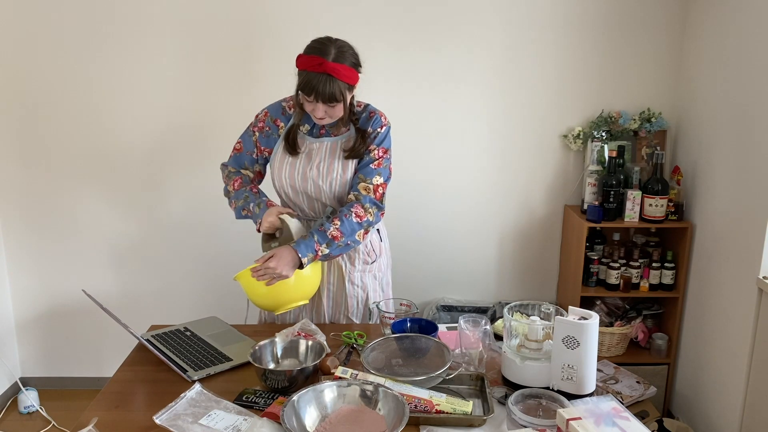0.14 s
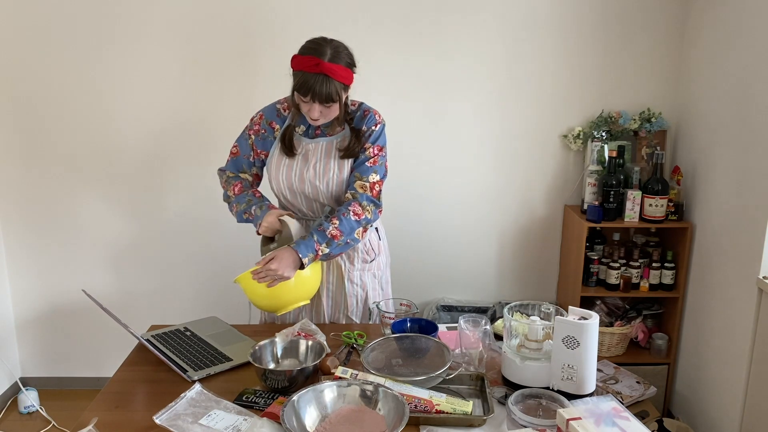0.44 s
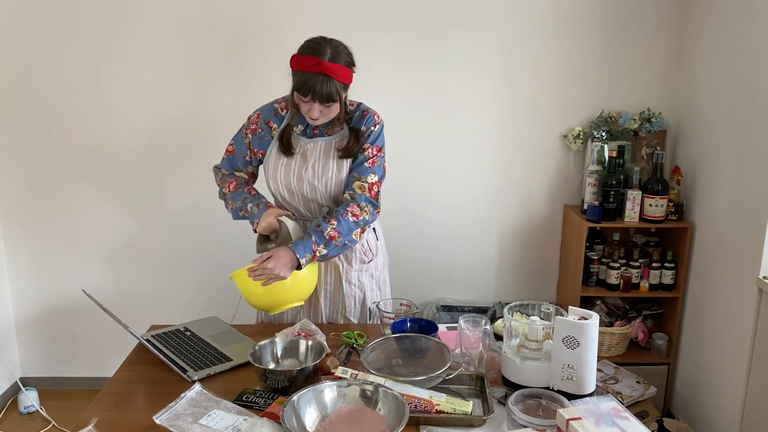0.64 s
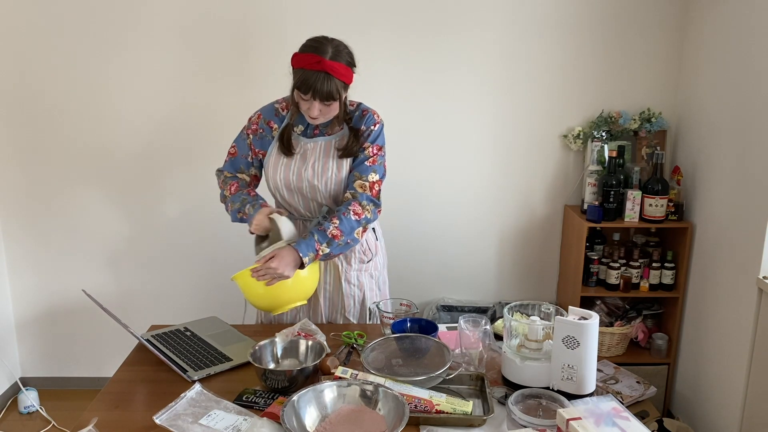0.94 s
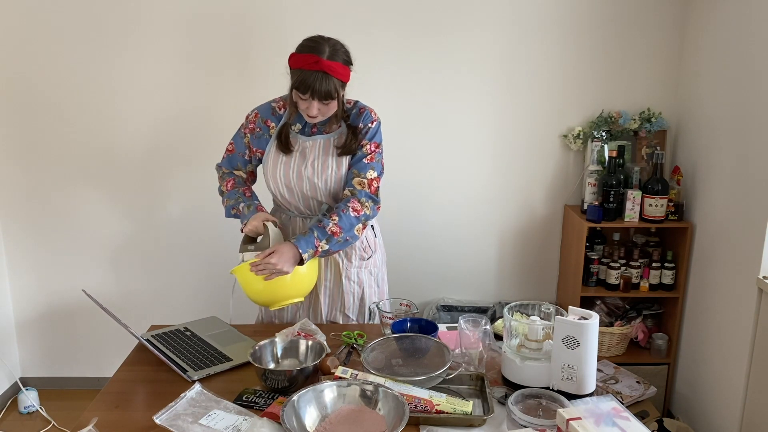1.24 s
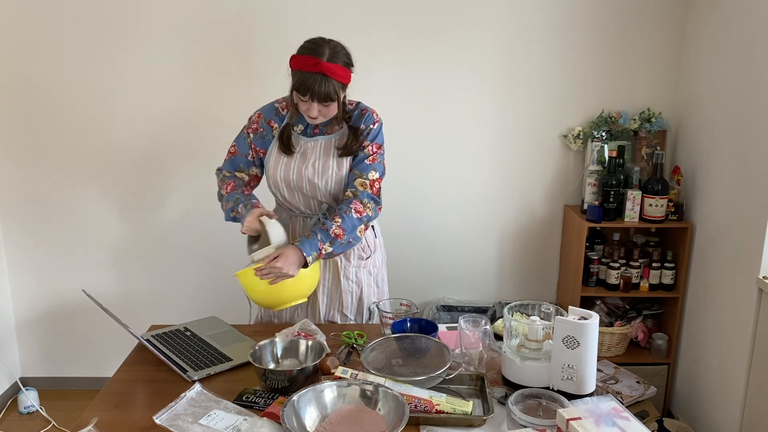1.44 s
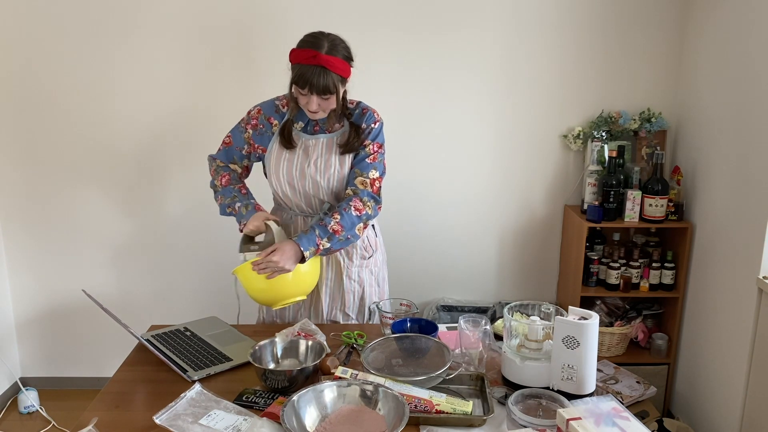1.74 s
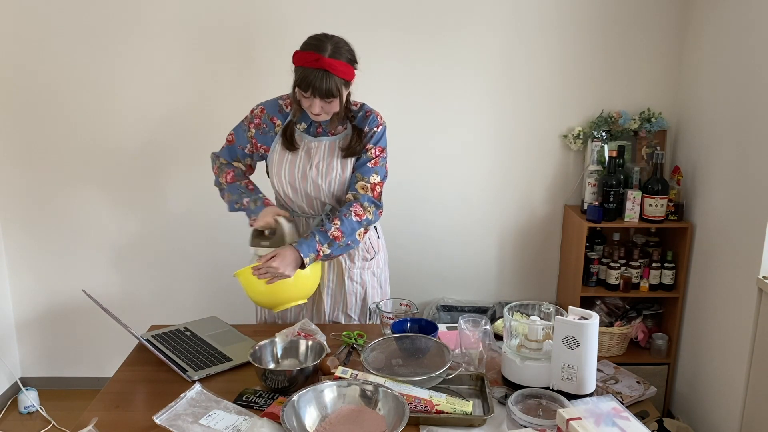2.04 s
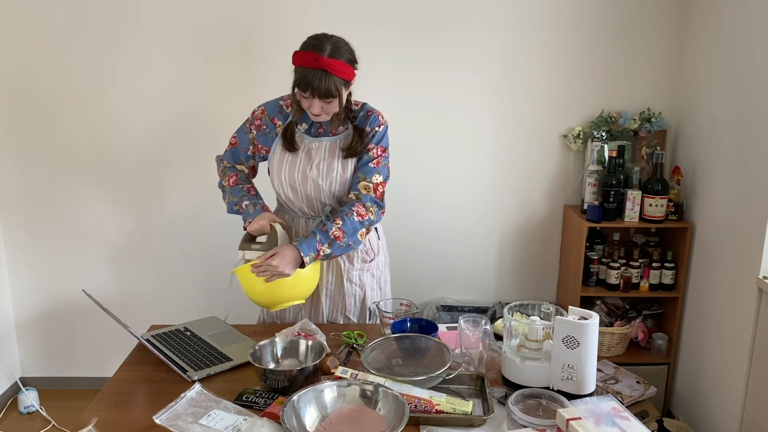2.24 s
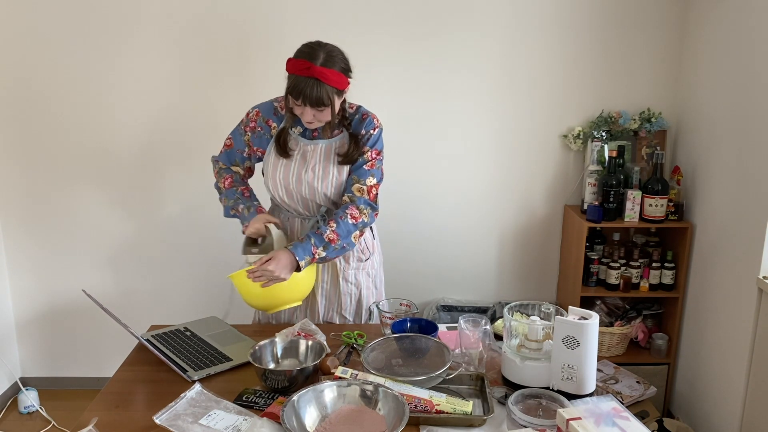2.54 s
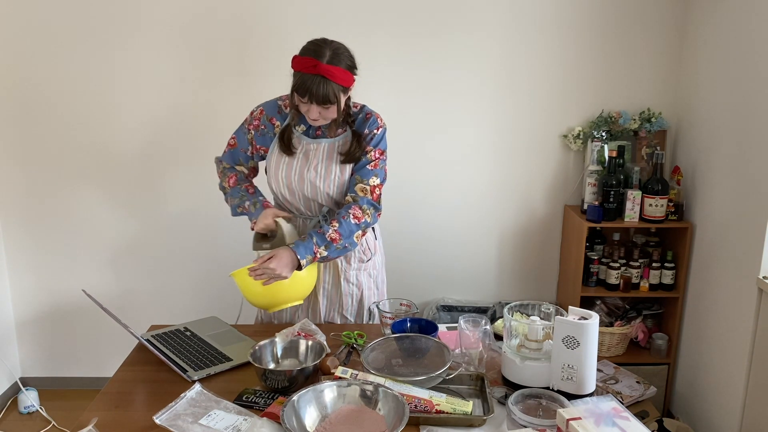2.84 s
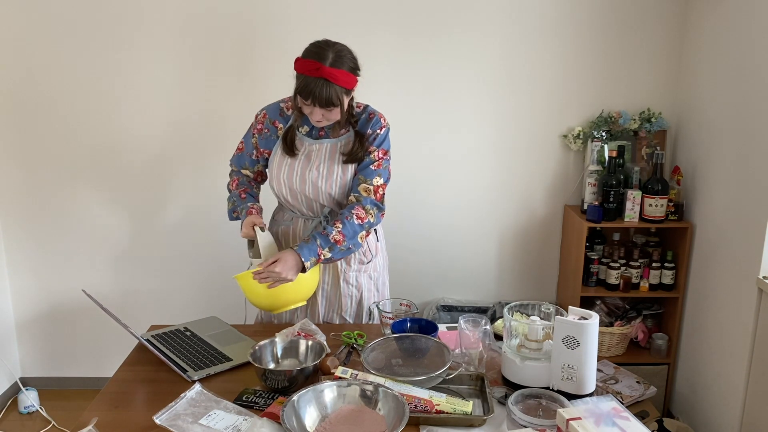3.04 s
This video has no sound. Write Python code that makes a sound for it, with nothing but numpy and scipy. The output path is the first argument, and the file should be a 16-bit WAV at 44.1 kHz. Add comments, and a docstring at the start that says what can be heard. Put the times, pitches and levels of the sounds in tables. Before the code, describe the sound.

Electric hand mixer whips a mixture, beaters clattering rapidly in a plastic bowl, pulsing steadily.

```python
"""In a small kitchen, an electric hand mixer whips a mixture in a plastic bowl.
The beater wires clatter and scrape: trains of blows ring the bowl, harder and faster once in each turn.
Single knocks stand out; the flung mixture splashes as grainy noise.
Near the end the wires lift clear, leaving the motor's whine (gliding sines) and fan (noise),
then settle into an even rattle."""
import sys
import numpy as np
from scipy import signal
from scipy.fft import rfft, irfft, next_fast_len
from scipy.io import wavfile
from scipy.ndimage import uniform_filter1d, minimum_filter1d, map_coordinates

SR = 44100
rng = np.random.default_rng(int(sys.argv[2]) if len(sys.argv) > 2 else 0)


def bounce(signal):
    """Save signal as a 16-bit WAV file at the path given by the first command-line argument."""
    frames = np.transpose(np.atleast_2d(signal))
    limited = np.clip(frames, -1, 1)
    pcm = np.round(limited * 32767).astype(np.int16)
    wavfile.write(sys.argv[1], SR, pcm)


N = 141120


def amp(db):
    """Amplitude factor of a level in dB."""
    return 10 ** (np.asarray(db) / 20)


def unit(x):
    """x scaled to rms 1."""
    return x / np.sqrt(np.mean(x ** 2) + 1e-20)


def along(points, hz):
    """Interpolate (frequency [Hz], value) points on a log frequency axis."""
    point_hz, value = np.transpose(points)
    return np.interp(np.log(hz + 1), np.log(point_hz + 1), value)


def wobble(knots_per_s):
    """Smooth random curve through normally distributed knots."""
    knots = rng.standard_normal(int(N * knots_per_s / SR) + 4)
    return map_coordinates(knots, [np.arange(N) * knots_per_s / SR])


def coloured(x, points):
    """Minimum-phase filter through (frequency [Hz], gain [dB]) points, made by folding the cepstrum."""
    m = 2 * next_fast_len(N)
    cepstrum = irfft(np.log(amp(along(points, np.fft.rfftfreq(m, 1 / SR)))))
    cepstrum[1:m // 2] *= 2
    cepstrum[m // 2 + 1:] = 0
    return irfft(rfft(x, m) * np.exp(rfft(cepstrum)), m)[..., :N]


def hiss(points, side_db=-3, left_db=1.5):
    """Coloured stereo noise of rms 1, a little to the left."""
    mid, side = coloured(rng.standard_normal((2, N)), points)
    side = side * amp(side_db)
    return unit(np.array([mid + side, mid - side]) * amp([[left_db], [-left_db]]))


def mode(start_s, hz, t60_s):
    """One damped tone that builds up over about its first cycle."""
    after_s = np.maximum(np.arange(N) / SR - start_s, 0)
    envelope = amp(-60 * after_s / t60_s) * (1 - np.exp(-2 * hz * after_s))
    return envelope * np.sin(2 * np.pi * hz * after_s)


# Turns of the beaters: (time of hardest contact [s], contact level [dB])
TURN_CONTACTS = [(-.012, -12.5), (0.058, -25), (0.135, -15.5), (.213, -14.5), (.282, -13.5), (0.355, -16),
                 (.426, -16.5), (.504, -16.5), (.574, -14.5), (0.637, -22), (.713, -15), (0.789, -15),
                 (.859, -14.5), (.93, -14), (0.999, -15), (1.068, -15.5), (1.136, -19), (1.205, -21.5),
                 (1.274, -24), (1.341, -19), (1.418, -12), (1.49, -14), (1.557, -15), (1.629, -16.5),
                 (1.699, -15), (1.766, -16.5), (1.834, -18), (1.904, -20.5), (1.976, -13.5), (2.053, -13.5),
                 (2.124, -14), (2.196, -16.5), (2.269, -17), (2.339, -18), (2.413, -14), (2.489, -16),
                 (2.558, -16), (2.63, -18), (2.696, -19), (2.772, -14.5), (2.848, -14), (2.917, -17),
                 (2.977, -30), (3.045, -24)]
# Course of every turn: (share of turn after hardest contact [0-1], nominal strike rate [1/s],
# clatter [dB], scrape [dB], splash [dB])
TURN_COURSE = [(0, 161.5, 1, -5.5, -2.5), (.14, 158, -4.5, -17.5, 0), (.29, 151, -6.5, -17, -1.5),
               (.44, 121, -9, -9.5, -1.5), (.58, 113, -11, -13.5, -6.5), (.68, 166, -3, -2.5, -5),
               (.88, 164, 0, 1, -0.5)]
# Changes of touch with the bowl: (start [s], end [s], level change [dB])
TOUCH_CHANGES = [(2.935, 2.94, 2), (2.986, 3.094, -25)]
# Light turns run evenly, hard turns speed up and drag
EVEN_BELOW_DB, UNEVEN_ABOVE_DB, RATE_WAVER = -23, -17, .008
# Even rattle at the end: speeds up, starts softer
SETTLE_S, SETTLE_RISE_S = 3.095, .014
SETTLE_FROM_HZ, SETTLE_HZ = 92, 141.7
SETTLE_DB, SETTLE_SOFT_DB, SETTLE_SCRAPE_DB, SETTLE_SPLASH_DB = -20, -9, -2.5, -1.5
DIP_S = .017  # clatter may drop for this long before a knock


def motion():
    """Beater rotation: place in the turn, strike count, and levels of clatter, scrape and splash."""
    t = np.arange(N) / SR
    contact_s, contact_db = np.transpose(TURN_CONTACTS)
    turn = np.interp(t, contact_s, np.arange(len(contact_s)))
    force_db = np.interp(t, contact_s, contact_db)
    share, *columns = np.transpose(TURN_COURSE)
    rate_hz, clatter_db, scrape_db, splash_db = [np.interp(turn, share, c, period=1) for c in columns]

    uneven = np.clip((force_db - EVEN_BELOW_DB) / (UNEVEN_ABOVE_DB - EVEN_BELOW_DB), 0, 1)
    rate_hz = (SETTLE_HZ + uneven * (rate_hz - SETTLE_HZ)) * (1 + RATE_WAVER * wobble(20))
    settled = t >= SETTLE_S
    loose = np.exp(-np.maximum(t - SETTLE_S, 0) / SETTLE_RISE_S)
    rate_hz = np.where(settled, SETTLE_HZ + (SETTLE_FROM_HZ - SETTLE_HZ) * loose, rate_hz)
    force_db = np.where(settled, SETTLE_DB + SETTLE_SOFT_DB * loose, force_db)

    change_db = sum(change * ((t > a) & (t < b)) for a, b, change in TOUCH_CHANGES)
    change_db = change_db + sum(change * ((t > s - DIP_S) & (t < s)) for s, _, change in KNOCK_BLOWS)
    strikes = np.cumsum(rate_hz) / SR
    strikes -= np.interp(SETTLE_S + .001, t, strikes)  # a strike falls 1 ms after settling

    touch_db = force_db + change_db
    splash_change_db = 0.14 * uniform_filter1d(change_db, size=400)  # splash barely follows
    return (turn, strikes,
            touch_db + np.where(settled, 0, clatter_db),
            touch_db + np.where(settled, SETTLE_SCRAPE_DB, scrape_db),
            force_db + splash_change_db + np.where(settled, SETTLE_SPLASH_DB, splash_db))


JITTER_S, SCATTER_DB = .00005, 1.76  # standard deviations
REBOUND_DECAY_S, REBOUND_FROM_HZ = 0.003, 645  # rebounds carry little bass


def strike_train(strikes, chatter):
    """One blow per passing wire, each followed by a short noise burst of rebounds."""
    at = np.flatnonzero(np.diff(np.floor(strikes)) > 0)
    chance = rng.standard_normal((len(at), 2))
    shift = np.round(chance[:, 0] * JITTER_S * SR).astype(int)
    blows = np.zeros(N)
    blows[np.clip(at + shift, 0, N - 1)] = amp(SCATTER_DB * chance[:, 1])

    decay = signal.lfilter([1], [1, -np.exp(-1 / (REBOUND_DECAY_S * SR))], blows)
    highpass = signal.butter(2, REBOUND_FROM_HZ, 'highpass', fs=SR, output='sos')
    bursts = signal.sosfilt(highpass, decay * rng.standard_normal(N))
    return unit(blows) + chatter * unit(bursts)


ECHO_S, ECHO_GAIN = .0013, 0.51  # mean delay, all-pass coefficient


def spread(train, turn, count=3):
    """Each turn meets the bowl at a new place: random all-pass echoes to and fro in its wall."""
    out = np.zeros(N + SR)
    turn_index = np.round(turn)
    for k in np.unique(turn_index):
        at = np.flatnonzero(turn_index == k)
        part = np.pad(train[at], (0, SR // 20))
        for echo_s in ECHO_S * (.5 + rng.random(count)):
            back = np.r_[1, np.zeros(int(echo_s * SR)), ECHO_GAIN]
            part = signal.lfilter(back[::-1], back, part)
        out[at[0]:at[0] + len(part)] += part
    return out[:N]


def struck(train, turn, level_db, points):
    """A train of blows rings a body at the given level."""
    return coloured(spread(train * amp(level_db), turn), points) / np.std(coloured(train, points))


# Ring of bowl and beaters: (frequency [Hz], relative level [dB])
BOWL_RING = [(100, -70), (200, -28.5), (480, -28.5), (570, -10.5), (655, -8), (735, -17), (800, -12.5),
             (850, -12), (920, -2), (1110, -6), (1200, -6), (1295, 5), (1440, 2), (1660, -9), (1750, -8.5),
             (2100, -3), (2300, -20), (2900, -25), (3300, -30.5), (6000, -35), (15000, -81)]
# Broader sound of brushing wires: (frequency [Hz], gain over the ring [dB])
BRUSH_TONE = [(400, 2), (650, -1), (880, 5), (1000, 1.5), (1300, -1), (1900, 1.5)]
# Duller tone of the even rattle: (frequency [Hz], gain over the ring [dB])
EVEN_TONE = [(560, 7.5), (680, 1.5), (1200, 1), (1300, 0), (2000, -6.5), (6000, 1.5)]
BRUSH_BELOW_DB, HARD_ABOVE_DB = -20, -19.5  # brushing turns into hitting in between
SECOND_LAG, SECOND_DB, CHATTER = 0.4219, -4, 0.68  # lag as share of a strike period


def clatter(turn, strikes, level_db):
    """Both beaters ring the bowl by brushing or hitting it; at the end just one rattles on evenly."""
    first = strike_train(strikes, CHATTER)
    second = amp(SECOND_DB) * strike_train(strikes - SECOND_LAG, CHATTER)
    hard = np.clip((level_db - BRUSH_BELOW_DB) / (HARD_ABOVE_DB - BRUSH_BELOW_DB), 0, 1)
    settled = np.arange(N) / SR >= SETTLE_S
    whipping = struck(first + second, turn, level_db, BOWL_RING) * ~settled
    brushing = coloured(whipping * (1 - hard), BRUSH_TONE)

    single = strike_train(strikes, chatter=1.0)
    even = coloured(single * amp(level_db) * settled, BOWL_RING) / np.std(coloured(single, BOWL_RING))
    return whipping * hard + brushing + coloured(even, EVEN_TONE)


# Sharp single knocks, most after a drop in clatter:
# (time [s], peak level [dB], clatter change just before [dB])
KNOCK_BLOWS = [(.111, -13, -8), (1.2603, -17, -34), (1.321, -12.5, -22), (2.31, -12, -6), (2.6064, -5, 0),
               (2.681, -10.5, -4), (2.744, -13, -1.5)]
RIM_S, RIM_DB, RIM_HZ, RIM_T60_S = 1.261, -16, 970, .12


def knocks():
    """Single impulses ring the bowl; one sets its rim ringing as a damped tone."""
    blows = np.zeros(N)
    for s, peak_db, _ in KNOCK_BLOWS:
        blows[round(s * SR)] = amp(peak_db)
    ring_peak = np.abs(coloured(signal.unit_impulse(N), BOWL_RING)).max()
    return coloured(blows, BOWL_RING) / ring_peak + amp(RIM_DB) * mode(RIM_S, RIM_HZ, RIM_T60_S)


# Wire scrape at hard contact: (frequency [Hz], relative level [dB])
SCRAPE_TONE = [(300, -63), (2200, -12.5), (2500, 9.5), (2680, -1.5), (2860, 6.5), (3100, -13.5),
               (4500, -10), (6300, -27.5), (9000, -19)]


def wire_scrape(turn, strikes, level_db):
    """Passing wires excite the brighter scrape resonances."""
    return struck(strike_train(strikes, chatter=1.0), turn, level_db - 13.5, SCRAPE_TONE)


# Splash spectrum: (frequency [Hz], relative level [dB])
SPLASH_TONE = [(1880, -37), (3300, -1), (6280, -7), (8660, -0.5), (12500, -6), (15200, -20)]


def mixture_splash(level_db, grain_db=1.5):
    """Flung mixture: noise with a fast random level, following the contact force."""
    grainy = hiss(SPLASH_TONE) * amp(grain_db * wobble(900))
    return amp(level_db - 18.5) * unit(grainy)


# Motor speed: (time [s], nominal whine frequency [Hz])
MOTOR_GLIDE = [(0, 1415), (2.92, 1418), (3.02, 1440), (3.2, 1498)]
# Resonances of the case that the overtones glide through: (frequency [Hz], rms level [dB])
CASE_RESONANCES = [(1400, -42), (1441, -46.5), (1456, -51), (2870, -77), (2912, -51), (4330, -62),
                   (4400, -66)]
# Partials of the whine: (multiple of the whine frequency [-])
WHINE_PARTIALS = (1, 2, 3, 9)
WHINE_WAVER, PARTIAL_WAVER_DB = 0.0041, 1.4
NOTE_S, NOTE_HALF_S, NOTE_HZ, NOTE_DB = 0.637, 0.053, 560, -38  # in one light turn


def motor_whine():
    """Harmonics glide with motor speed and swell at case resonances; a low bowl note sounds once, briefly."""
    t = np.arange(N) / SR
    hz = np.interp(t, *np.transpose(MOTOR_GLIDE))
    phase = 2 * np.pi * np.cumsum(hz * (1 + WHINE_WAVER * wobble(60))) / SR
    whine = np.zeros(N)
    for k in WHINE_PARTIALS:
        level_db = along(CASE_RESONANCES, k * hz) + PARTIAL_WAVER_DB * wobble(20)
        whine += np.sqrt(2) * amp(level_db) * np.sin(k * phase)
    note_swell = np.maximum(1 - ((t - NOTE_S) / NOTE_HALF_S) ** 2, 0)
    return whine + amp(NOTE_DB) * note_swell * np.sin(2 * np.pi * NOTE_HZ * t)


HUM_HZ, HUM_DB, HUM_SWING_DB, HUM_WAVER_DB = 239, -57.5, 9, 2.9
BUMP_S, BUMP_DB, BUMP_HZ, BUMP_T60_S = 1.963, -52, 60, .07


def housing(turn):
    """The case drones between hard contacts, more under load, and is bumped once, faint and dull."""
    t = np.arange(N) / SR
    contact_s, contact_db = np.transpose(TURN_CONTACTS)
    load_db = .5 * np.interp(t, contact_s, contact_db - contact_db.mean())
    swing_db = -HUM_SWING_DB * np.cos(2 * np.pi * turn)
    level_db = HUM_DB + load_db + swing_db + HUM_WAVER_DB * wobble(10)
    hum = amp(level_db) * np.sin(2 * np.pi * HUM_HZ * t + wobble(20))
    return hum + amp(BUMP_DB) * mode(BUMP_S, BUMP_HZ, BUMP_T60_S)


# Fan spectrum: (frequency [Hz], relative level [dB])
FAN_TONE = [(100, -21), (170, -13), (260, 4.5), (6400, -6), (8400, 7.5), (10000, -5.5), (12800, 11.5),
            (13500, -1)]


def fan_rush():
    """Cooling fan: steady coloured noise."""
    return amp(-42.5) * hiss(FAN_TONE)


# Room decay: (frequency [Hz], T60 [s])
ROOM_T60 = [(200, 0.12), (5000, 0.1), (15000, 0.22)]
# Room share: (frequency [Hz], level against direct [dB])
ROOM_LEVEL = [(200, -21), (700, -9), (1300, -3), (4500, 5.5)]
LEFT_DB = 0.89


def kitchen(x):
    """Direct sound plus short noise tails, crossfading to fresh ones to even out chance colouring."""
    sent = coloured(x, ROOM_LEVEL)
    wet = np.zeros((2, N + SR))
    size = SR // 5  # a fresh random tail every 0.2 s
    for centre in range(0, N + size, size):
        at = np.arange(max(centre - size, 0), min(centre + size, N))
        piece = sent[at] * np.cos(np.pi / 2 * (at - centre) / size)
        hz, t, z = signal.stft(rng.standard_normal((2, SR // 3)), SR, nperseg=256)
        decay_db = -60 * t / along(ROOM_T60, hz)[:, None]
        tail = signal.istft(z * amp(decay_db), SR, nperseg=256)[1]
        tail = tail / np.linalg.norm(tail, axis=1, keepdims=True)
        part = signal.fftconvolve(piece[None], tail, axes=1)
        wet[:, at[0]:at[0] + part.shape[1]] += part
    return (x + wet[:, :N]) * amp([[LEFT_DB], [-LEFT_DB]])


def scene():
    """Bowl, beaters and motor sound through the room; splash and fan are added directly."""
    turn, strikes, clatter_db, scrape_db, splash_db = motion()
    bowl = clatter(turn, strikes, clatter_db) + knocks() + wire_scrape(turn, strikes, scrape_db)
    mixer = motor_whine() + housing(turn)
    return kitchen(bowl + mixer) + mixture_splash(splash_db) + fan_rush()


CEILING, TOP_HZ = .89, 15850


def record(dry):
    """A quick look-ahead limiter holds the peaks down; nothing is kept above the band limit."""
    needed = CEILING / np.maximum(np.abs(dry).max(axis=0), CEILING)
    gain = uniform_filter1d(minimum_filter1d(needed, size=401), size=401)
    m = next_fast_len(N + SR // 2)
    in_band = np.fft.rfftfreq(m, 1 / SR) < TOP_HZ
    return irfft(rfft(dry * gain, m) * in_band, m)[:, :N]


dry = scene()
out = record(dry)
bounce(out)
```